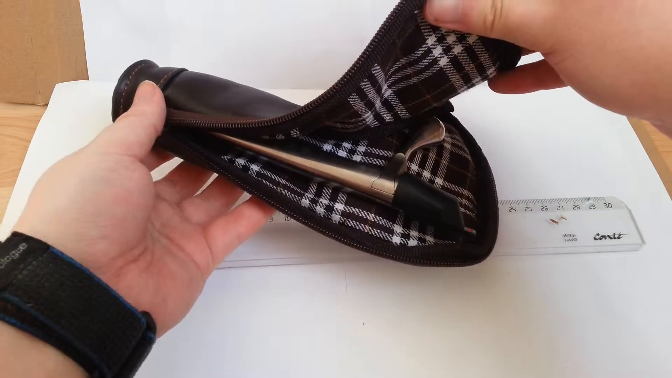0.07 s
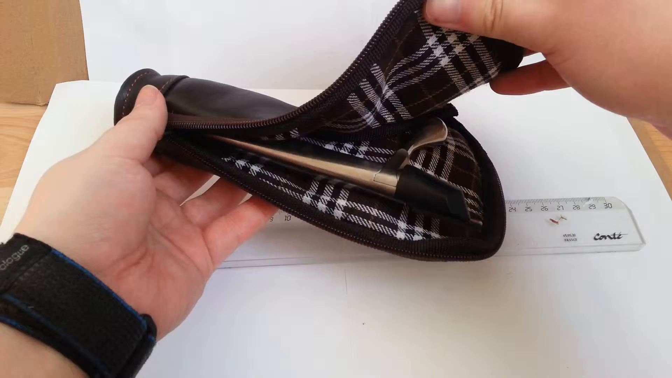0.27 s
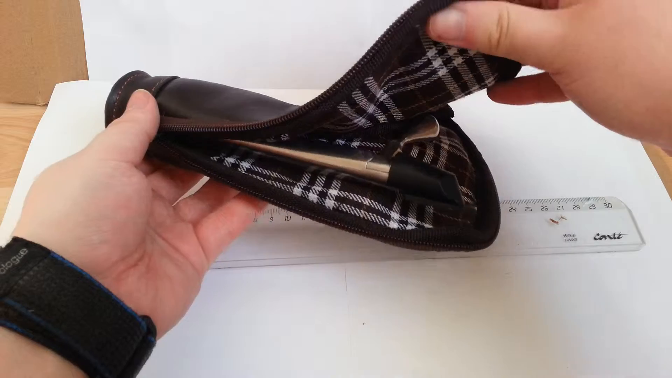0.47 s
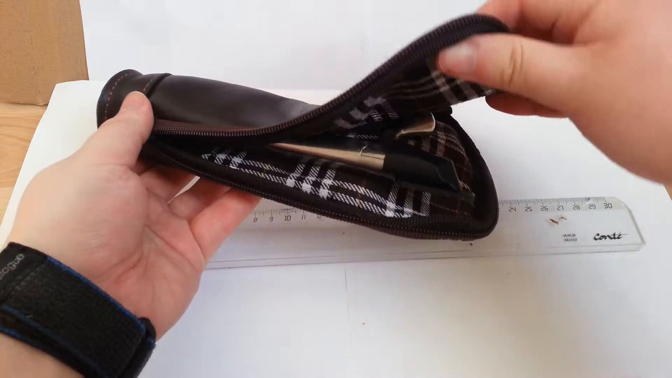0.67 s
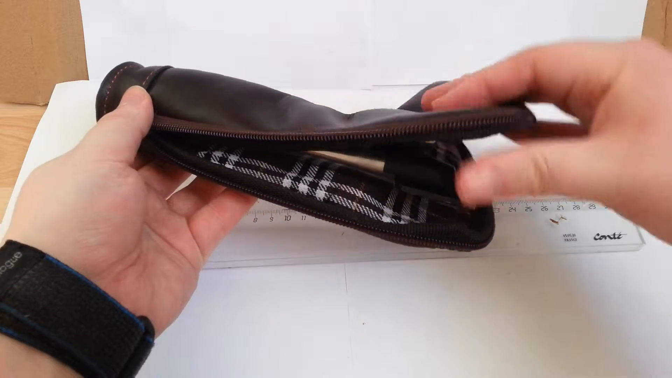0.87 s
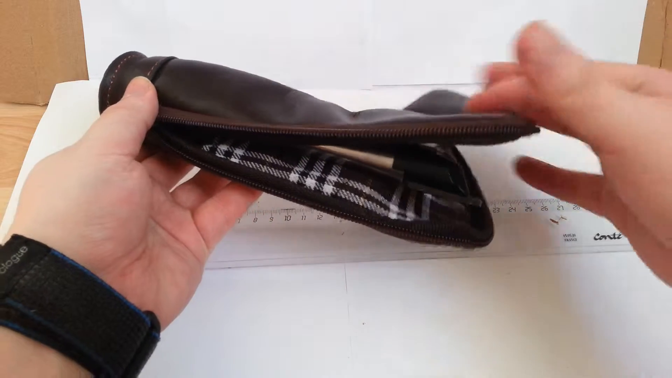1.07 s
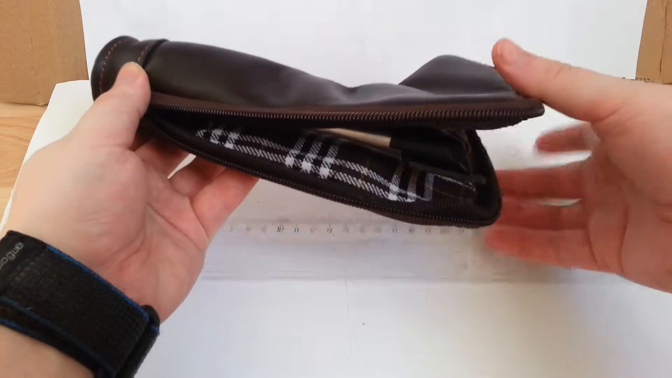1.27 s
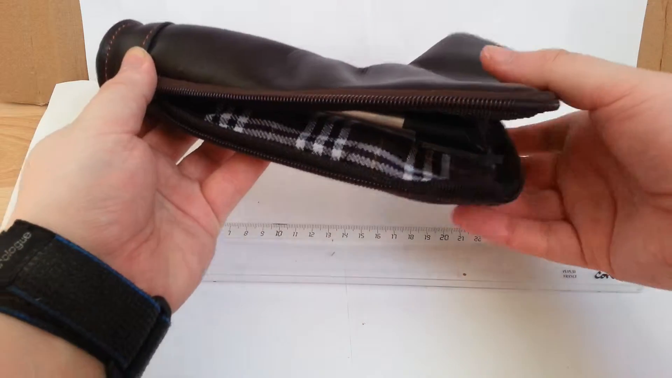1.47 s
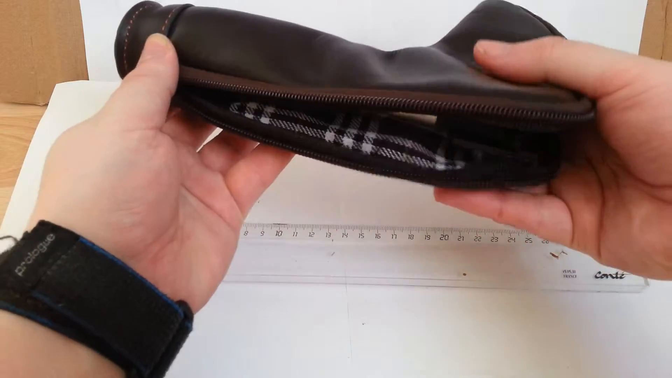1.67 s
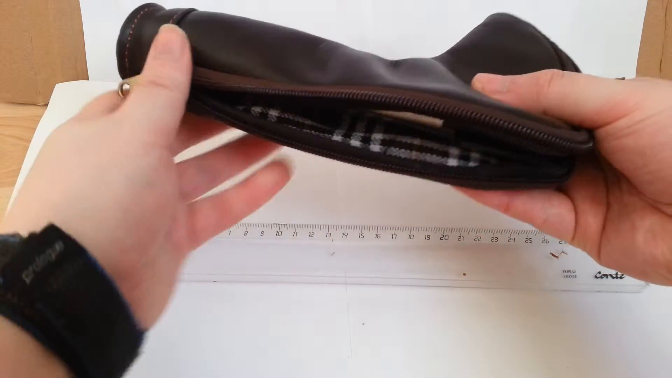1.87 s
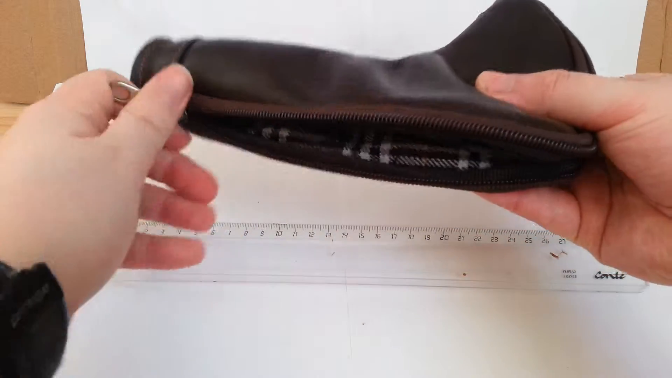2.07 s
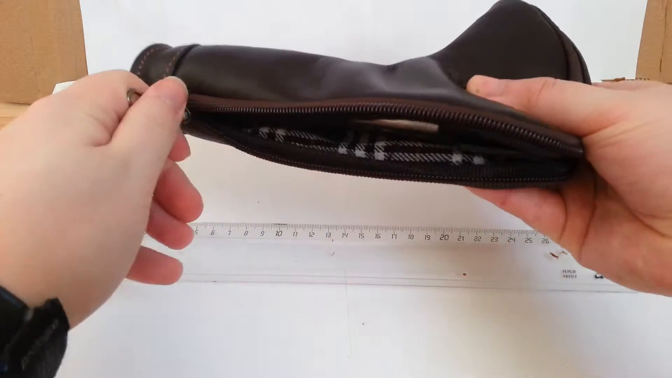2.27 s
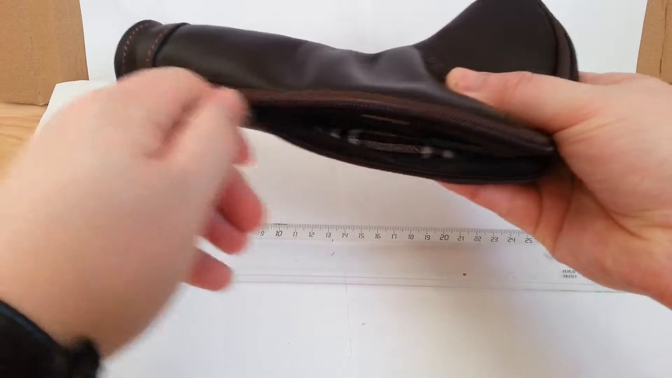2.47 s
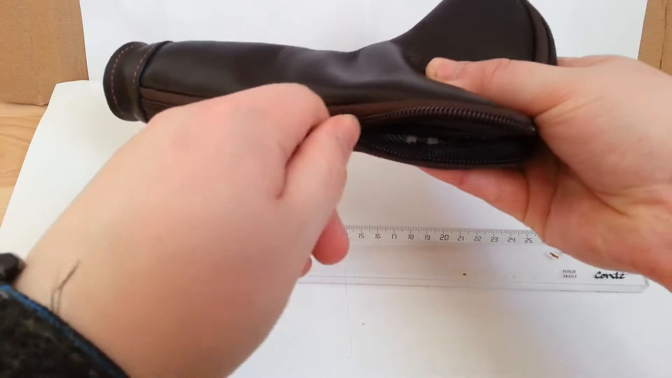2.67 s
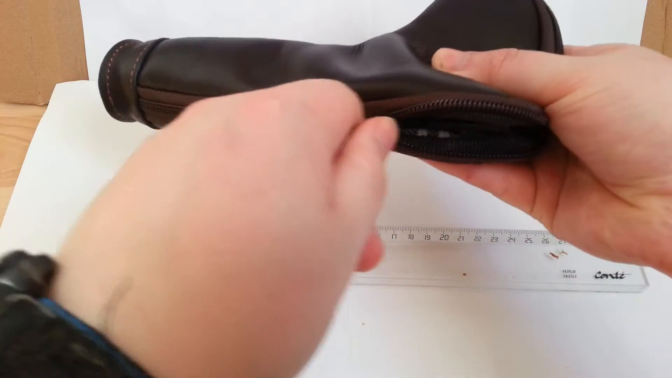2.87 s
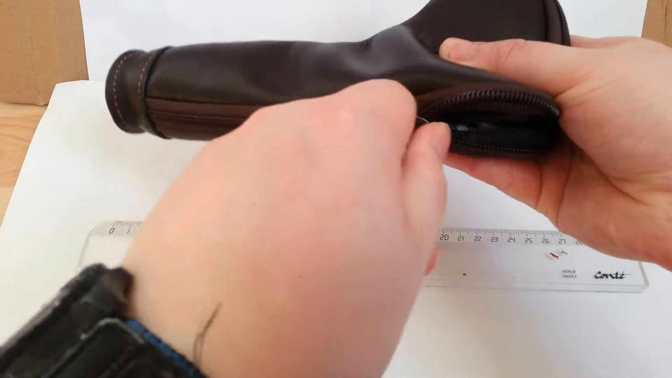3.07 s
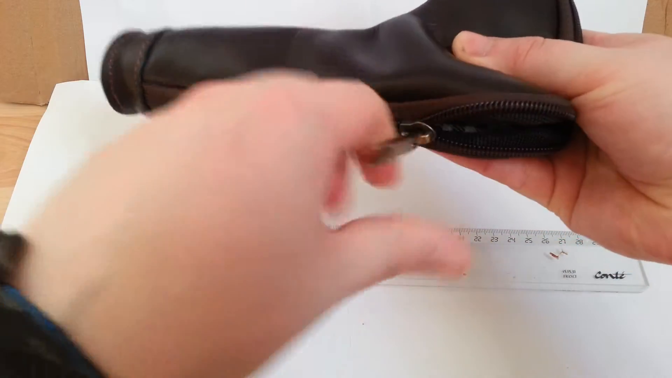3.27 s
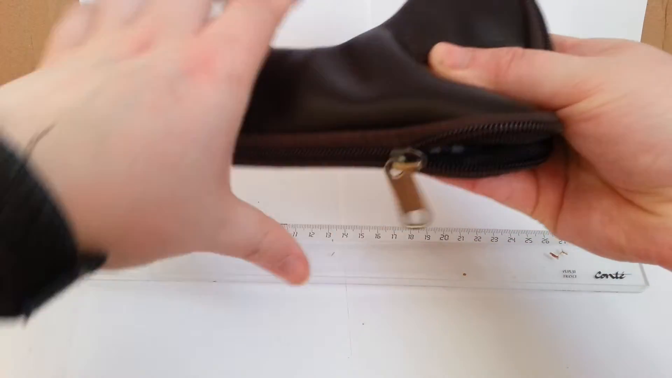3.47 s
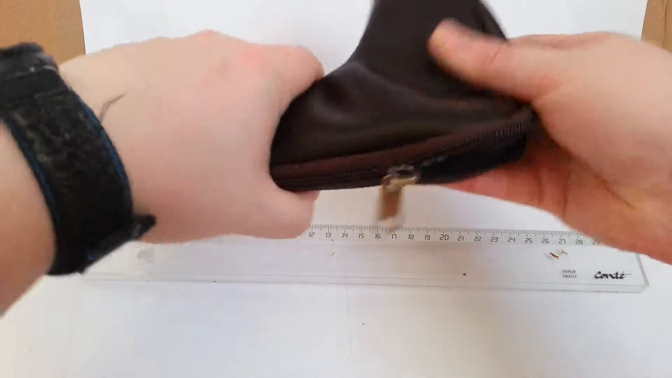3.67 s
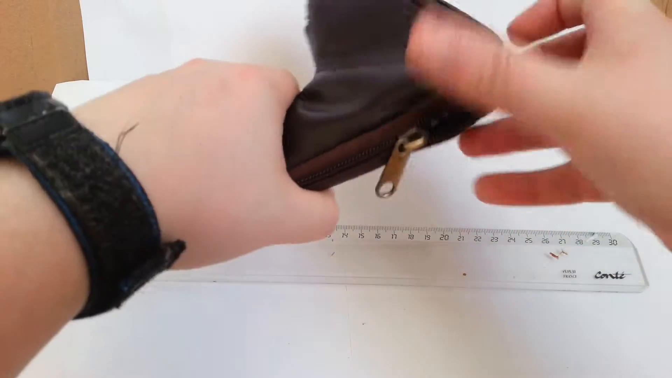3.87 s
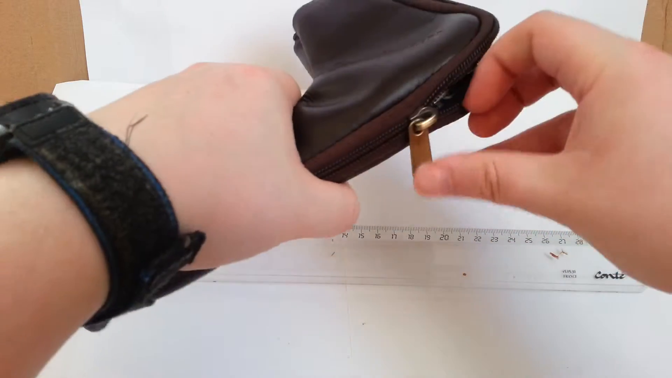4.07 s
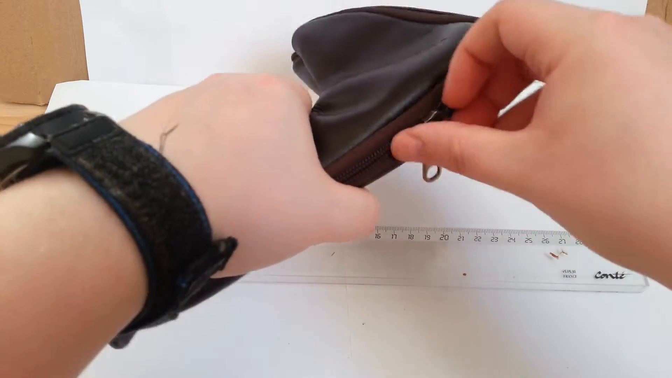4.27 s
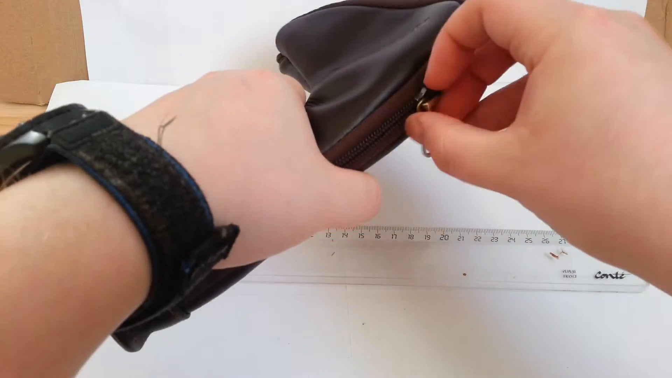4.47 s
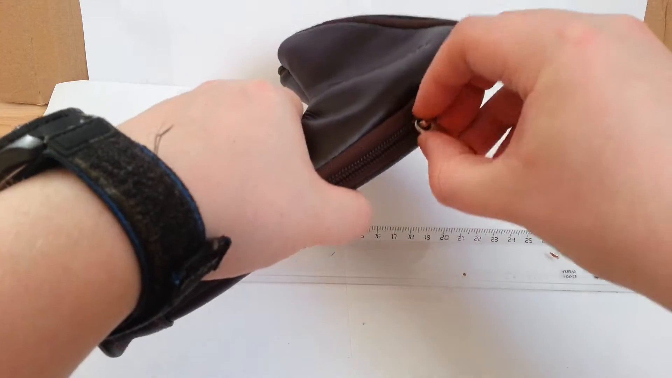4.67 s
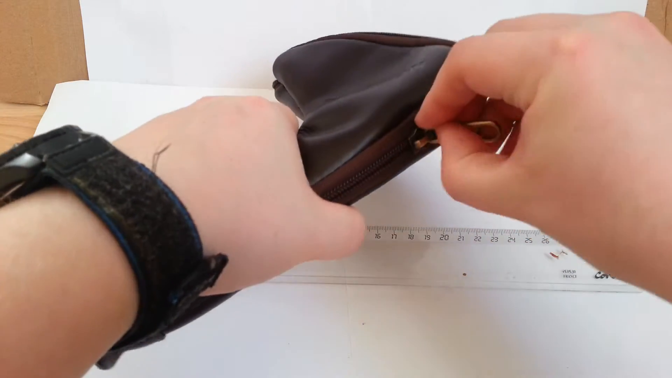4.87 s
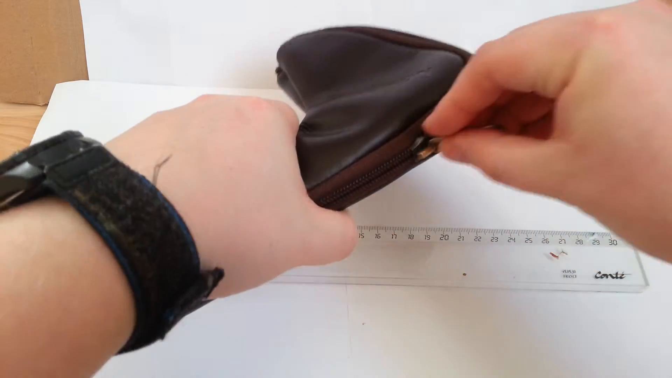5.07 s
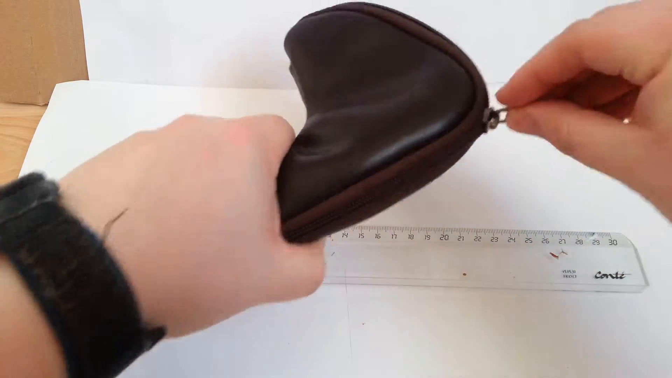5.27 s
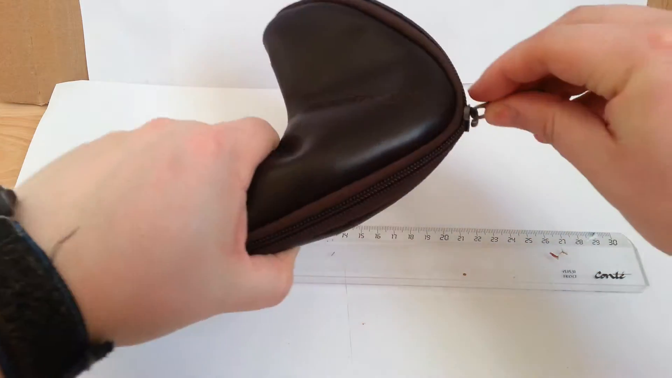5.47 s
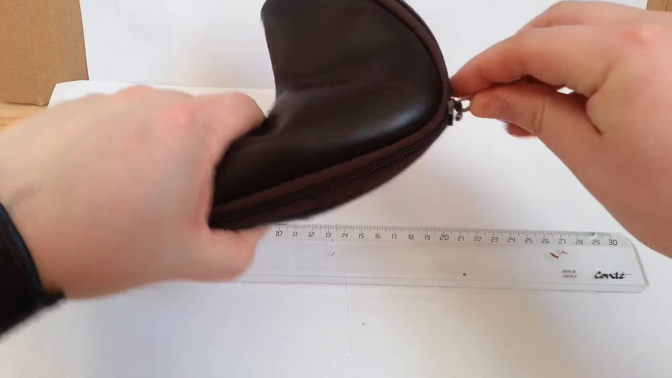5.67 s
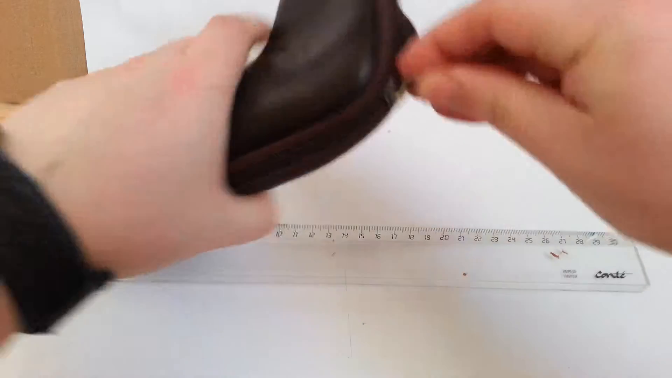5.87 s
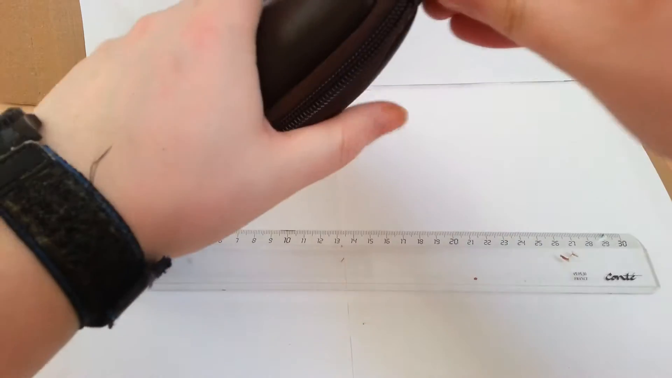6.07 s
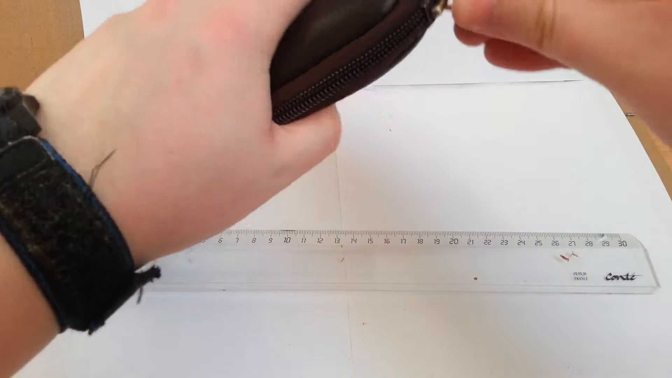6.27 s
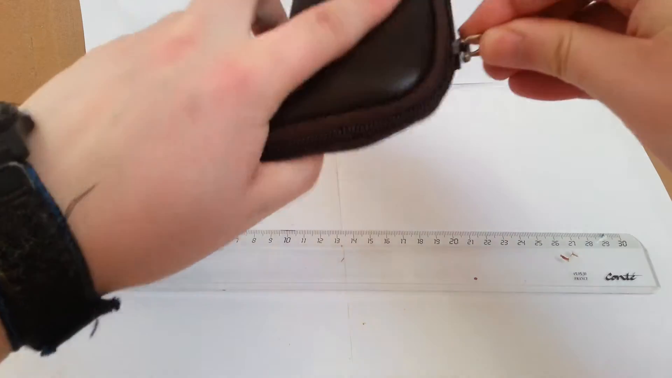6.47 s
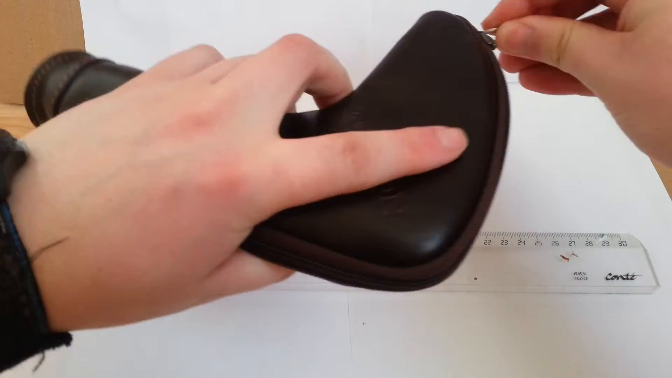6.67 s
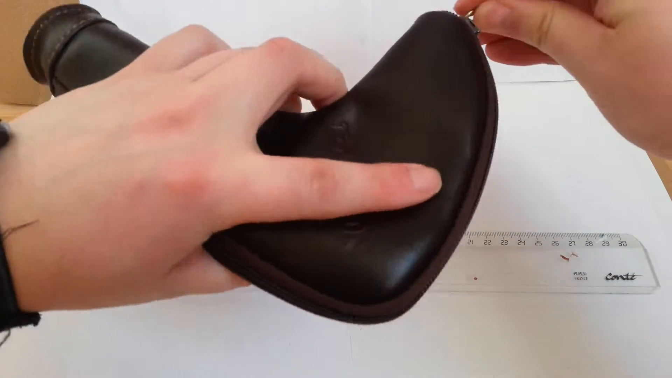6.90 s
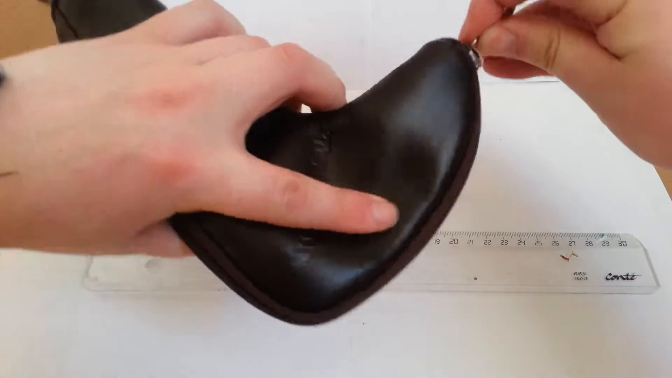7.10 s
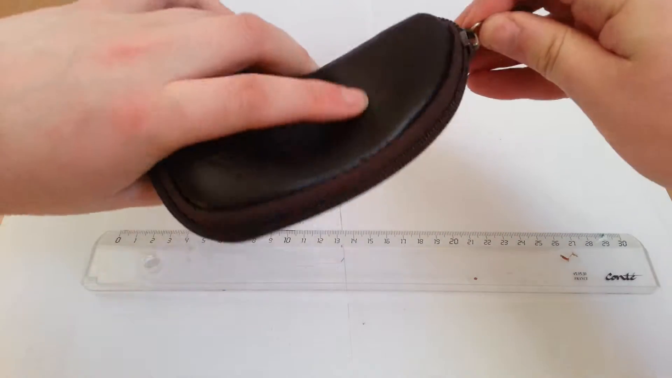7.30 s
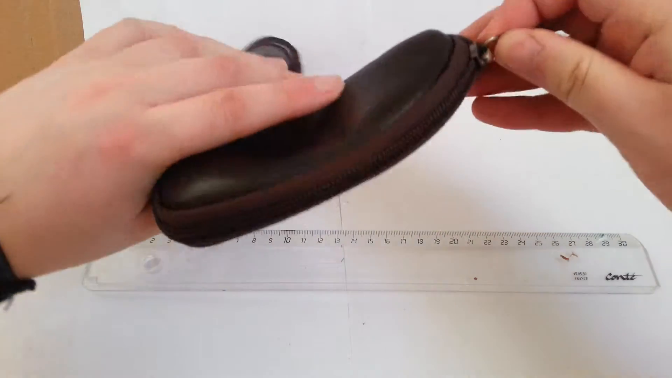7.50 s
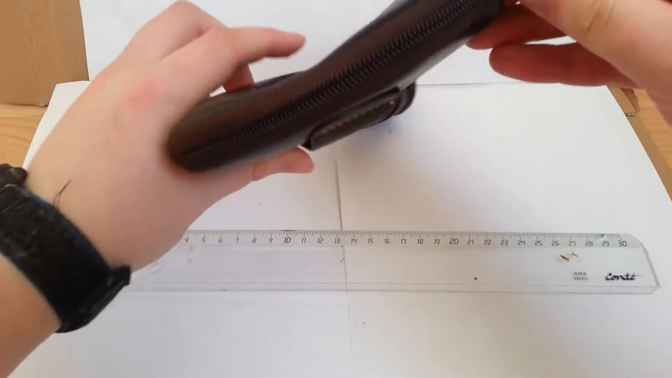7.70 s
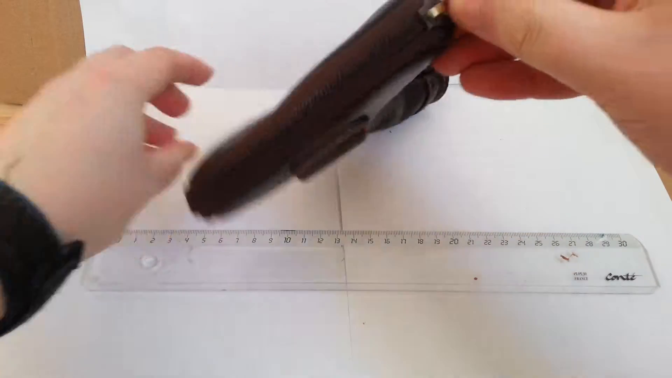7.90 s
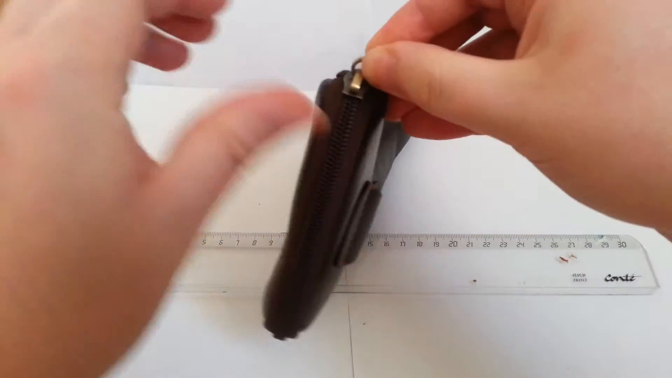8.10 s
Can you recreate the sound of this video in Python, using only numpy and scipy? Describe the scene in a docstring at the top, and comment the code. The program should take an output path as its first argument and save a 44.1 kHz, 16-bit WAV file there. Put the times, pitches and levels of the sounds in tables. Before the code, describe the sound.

Faint hiss and one small tick open the sound. At about 1.2 seconds, hands fold a leather case with a rub, a hollow thump and a brief rasp of a finger across zipper teeth. Bent leather ticks softly. From 2.4 to 3.1 seconds the zipper closes in short scraping pulls. Soft rubbing follows, with the metal pull tab clicking around 3.4, 4.6 and 4.8 seconds. Another short pull comes at 5.1. Near 6 seconds there is a thump and a sharp tab click, then the loudest, brightest zip runs from 6.4 to 6.9, ending on catching teeth. A bump at 7.6 leads into a thin skid of skin on leather and a last click at 8. Everything is close to the right microphone in a small room; the left is faint and dull. The hiss swells slightly with louder sounds.

```python
"""A zipper closed in short pulls on a leather case, close to the right microphone in a small room.
First a finger briefly rakes the teeth; in the pulls they snap and scrape through the slider and shake
the hollow case. Hands fold the case shut, rubbing, bending and bumping the leather; the metal pull tab
clicks, and skin skids once near the end. The left microphone gets a faint, dull, mostly diffuse share.
The recorder's noise suppressor lets the hiss swell with the louder sounds."""
import sys
import numpy as np
from scipy import signal
from scipy.fft import rfft, irfft
from scipy.io import wavfile
from scipy.ndimage import uniform_filter1d

SR = 44100
rng = np.random.default_rng(int(sys.argv[2]) if len(sys.argv) > 2 else 0)


def int16_out(signal):
    """Quantize to a 16-bit WAV file."""
    q = np.round(np.clip(np.atleast_2d(signal).T, -1, 1) * 32767)
    wavfile.write(sys.argv[1], SR, q.astype(np.int16))


N = 358956
TIME = np.arange(N) / SR
GRIP_FULL_S = 0.85   # the hands have taken hold and the flap starts to fold

# spectra of recorder hiss, rubbed leather and scratched rough surfaces: f/Hz, relative level/dB
HISS_SPECTRUM = [(20, -27.5), (90, -5), (180, -8), (400, -14), (3500, -26.5), (6300, -31), (9000, -28),
                 (14500, -28.5)]
LEATHER_SPECTRUM = [(100, -23.5), (260, 1.5), (1350, 3), (4000, -5), (6200, -14), (9000, -12), (15000, -19)]
SCRATCH_SPECTRUM = [(100, -42), (700, -16.5), (1400, 1), (2100, 4.5), (2850, -3), (3250, -2.5), (4400, -9),
                    (6000, -17.5), (8500, -15), (15000, -26.5)]
# response on the far side, at the left microphone: f/Hz, gain/dB
LEFT_RESPONSE = [(150, -3), (600, -22), (1200, -29.5), (3500, -42), (9000, -22)]
# resonances of the case walls, seam, slider, metal tab and case under the tab:
# f/Hz, bandwidth/Hz, relative level/dB
WALL_RESONANCES = [(280, 77, -2), (390, 37, 7.5), (432, 80, -30), (693, 26, -5)]
SEAM_RESONANCES = [(240, 64, 1), (376, 40, -2), (618, 290, -1)]
SLIDER_RESONANCES = [(522, 17, 7), (833, 183, 9.5), (967, 720, 5), (1356, 163, 6.5), (1504, 88, 2),
                     (1780, 104, -0.5)]
TAB_RESONANCES = [(3290, 943, 3.5), (5120, 640, 6.5), (6840, 1000, 0), (11995, 5500, -13)]
UNDER_TAB_RESONANCES = [(524, 230, 4.5), (1410, 500, 2.5)]
# fingers sliding on the leather: t/s, length/s, level/dB
FINGER_RUBS = [(1.06, 0.083, -54), (1.23, 0.091, -41), (1.56, 0.1, -56.5), (1.83, .27, -56),
               (2.205, 0.026, -49), (3.395, 0.02, -39.5), (3.53, .19, -47.5), (3.74, 0.26, -55),
               (4.36, 0.24, -57.5), (4.785, .04, -48.5), (5.34, 0.25, -53.5), (5.83, 0.081, -48),
               (5.92, 0.1, -41.5), (6.265, 0.21, -48.5), (6.85, .12, -72), (7.16, 0.2, -53.5),
               (7.63, .04, -47), (7.685, 0.26, -44.5), (8.05, 0.019, -41), (8.075, 0.029, -41.5)]
# bent leather ticking, thumps on the hollow case, the slider jumping one tooth: t/s, level/dB
LEATHER_TICKS = [(.04, -28), (1.605, -24), (1.855, -20.5), (1.897, -19.5), (1.985, -22.5), (2.038, -19),
                 (2.807, -21.5), (3.318, -17.5), (3.374, -22.5), (3.67, -20), (3.76, -20), (3.888, -26),
                 (4.438, -23.5), (5.829, -15.5), (6.371, -25)]
CASE_THUMPS = [(1.257, -7), (2.371, -15.5), (4.797, -22), (5.927, -5), (7.628, -11.5)]
TOOTH_CATCHES = [(2.847, -20), (2.878, -16.5), (2.908, -17), (5.841, -10), (6.775, -6.5), (6.826, -7.5)]
# a brief rasp of a finger raking the zipper teeth, then the zipper pulls, each taking over from the last:
# t/s, speed-up/s, hold/s, slow-down/s, first tooth rate/Hz, held tooth rate/Hz, force/dB, swell/dB,
# boom offset/dB, scratch offset/dB, tape note/Hz
TOOTH_STROKES = [(1.253, .02, .01, 0.11, 260, 360, -34.5, 6.5, -7, -1.5, 1450),
                 (2.367, 0.067, .03, .1, 126, 134, -33, 1.5, -9, -8.5, 1263),
                 (2.452, 0.032, 0.011, 0.14, 174, 250, -32.5, -0.5, -5.5, -4.5, 1100),
                 (2.505, 0.07, .04, 0.17, 305, 316, -34, 2, -6, -2, 1020),
                 (2.886, 0.044, .035, .1, 85.4, 98, -43, 2, -4.5, -3, 1051),
                 (3.014, 0.036, .01, .07, 87, 88, -50, 2.5, -3, -1, 1190),
                 (5.125, .06, .01, .16, 132, 297, -39.5, 8.5, -4.5, 0, 880),
                 (5.239, .03, .02, .09, 135, 115, -47, -0.5, 0.5, 0.5, 1037),
                 (6.447, 0.065, 0.038, 0.058, 170, 288, -25, 18.5, -19, -9, 1003),
                 (6.548, .055, .008, .06, 300, 440, -16.5, 3, -27.5, -12, 1530),
                 (6.664, .02, .012, .07, 128.4, 125, -34, -2.5, -6, -10.5, 910),
                 (6.782, 0.0118, .012, 0.059, 122, 125, -33, 1, -4.5, -11, 880)]
# pull tab striking the slider: t/s, level/dB, offset of the share reaching the case/dB
TAB_STRIKES = [(3.403, -28, 6), (3.416, -21, 1.5), (4.5803, -22, -1), (4.7904, -23, 4), (4.801, -15.5, 0.5),
               (5.9936, -11, -5), (6.0033, -4, -17), (8.0272, -23, 2)]


def from_db(db):
    """Decibels to gain."""
    return 10 ** (np.asarray(db) / 20)


def unit_energy(response):
    """Scale a response so that it passes white noise at unchanged power."""
    return response / np.sqrt(np.sum(response ** 2) + 1e-20)


def through(x, response):
    """Pass a signal through an impulse response."""
    return signal.oaconvolve(x, response)[:N]


def colour(points, size=4096):
    """Causal (minimum-phase) impulse response with the given spectrum."""
    hz, db = np.transpose(points)
    grid_hz = np.maximum(np.arange(size // 2 + 1) * SR / size, 1)
    gain = from_db(np.interp(np.log(grid_hz), np.log(hz), db))
    cepstrum = irfft(np.log(gain))
    cepstrum[1:size // 2] *= 2
    cepstrum[size // 2 + 1:] = 0
    return irfft(np.exp(rfft(cepstrum)))


def hiss():
    """The recorder's steady noise floor, independent in each channel."""
    response = unit_energy(colour(HISS_SPECTRUM))
    return np.array([through(white, response) for white in rng.standard_normal((2, N))])


def flutter(per_s):
    """Smooth random wander with a spread of about 1."""
    knots = rng.standard_normal(N // 20)
    return np.interp(TIME * per_s, np.arange(len(knots)), knots)


def gestures(rows, attack_s, release_s, sag_db_per_s=0):
    """Gain of hand movements: each sets in, holds or sags, and dies away."""
    gain = np.zeros(N)
    for start, length, db in rows:
        first = int(start * SR)
        t = np.arange(min(SR, N - first)) / SR
        attack = np.minimum(t / attack_s, 1)
        release = np.exp(-np.maximum(t - length, 0) / release_s)
        gain[first:first + SR] += from_db(db - sag_db_per_s * t) * attack * release
    return gain


def rubbing(grains_per_s=1500, grain_db=-5, smooth_db=-3, uneven_db=2, grip_db=-60.5):
    """Skin slides over the grain of the leather: a soft swish with tiny slips in it."""
    slips = rng.random(N) < grains_per_s / SR
    grains = slips * rng.standard_normal(N) * np.sqrt(SR / grains_per_s)
    friction = from_db(grain_db) * grains + from_db(smooth_db) * rng.standard_normal(N)
    holding = from_db(grip_db) * np.minimum(TIME / GRIP_FULL_S, 1)
    pressure = np.hypot(holding, gestures(FINGER_RUBS, attack_s=0.011, release_s=0.024))
    swish = friction * pressure * from_db(uneven_db * flutter(90))
    return through(swish, unit_energy(colour(LEATHER_SPECTRUM)))


def contacts(times, levels_db, crunch_s, crunch, size=4096):
    """Each contact is a sharp click and a short crunch of tiny slips."""
    force, t = np.zeros(N + size), np.arange(size) / SR
    for s, db, slips in zip(times, levels_db, rng.standard_normal((len(times), size))):
        burst = crunch * unit_energy(slips * np.exp(-t / crunch_s))
        burst[0] += 1   # the click
        start = int(s * SR)
        force[start:start + size] += from_db(db) * unit_energy(burst)
    return force[:N]


def ringing(modes, size=4096):
    """Impulse response of damped modes, rolled off outside their range."""
    t = np.arange(size) / SR
    rings = sum((-1) ** k * from_db(db) * width * np.exp(-np.pi * width * t) * np.cos(2 * np.pi * hz * t)
                for k, (hz, width, db) in enumerate(modes))
    band = signal.butter(2, [modes[0][0] * 0.7, modes[-1][0] * 1.2], "band", fs=SR, output="sos")
    return unit_energy(signal.sosfilt(band, rings))


def case(boom, boom_modes, rasp, scratch):
    """Three forces sound: boom in the hollow case, rasp in the slider, scratch on the rough surfaces."""
    return (through(boom, ringing(boom_modes)) + through(rasp, ringing(SLIDER_RESONANCES))
            + through(scratch, unit_energy(colour(SCRATCH_SPECTRUM))))


def knocks(rows, boom_db, scratch_db, crunch_s):
    """Brief contacts shake the walls, the slider and the rough surfaces together."""
    times, db = np.transpose(rows)
    boom = contacts(times, db + boom_db, crunch_s=0.0067, crunch=0.69)
    rasp = contacts(times, db, crunch_s, crunch=1.34)
    scratch = contacts(times, db + scratch_db, crunch_s, crunch=2.5)
    return case(boom, WALL_RESONANCES, rasp, scratch)


def handling(faint_per_s=3, faint_db=-32, spread_db=1):
    """Bent leather ticks, often very faintly; the case is thumped; the slider catches on single teeth."""
    times = GRIP_FULL_S + np.cumsum(rng.exponential(1 / faint_per_s, size=60))
    levels_db = faint_db + spread_db * rng.standard_normal(len(times))
    faint_ticks = [(s, db) for s, db in zip(times, levels_db) if s < TIME[-1]]
    return (knocks(CASE_THUMPS, boom_db=1.5, scratch_db=-4, crunch_s=0.0031)
            + knocks(TOOTH_CATCHES, boom_db=-12, scratch_db=-13.5, crunch_s=0.004)
            + knocks(list(LEATHER_TICKS) + faint_ticks, boom_db=-12, scratch_db=0, crunch_s=0.0023))


def stroke_motion(stop_teeth_per_s=80, fade_db=32, boom_db_per_octave=-1, scratch_db_per_octave=7.5,
                  note_octaves_per_db=0.17):
    """Each stroke along the teeth gets up to speed, holds and slows; its force and colour follow."""
    rate, note_hz = np.full((2, N), float(stop_teeth_per_s))
    force, boom_db, scratch_db = np.zeros((3, N))
    for start, rise, hold, fall, first_rate, held_rate, db, swell_db, boom, scratch, hz in TOOTH_STROKES:
        now = slice(int(start * SR), int((start + rise + hold + fall) * SR))
        t = TIME[now] - start
        rising = np.clip(t / rise, 0, 1)
        falling = np.clip((t - rise - hold) / fall, 0, 1)
        sped_up = np.sin(np.pi / 2 * rising) ** 2
        slowing = (stop_teeth_per_s / held_rate) ** falling
        rate[now] = first_rate * (held_rate / first_rate) ** sped_up * slowing
        # the force swells fast, levels off, then drains away as the stroke slows
        force[now] = from_db(db - swell_db * (1 - rising) ** 3.2 - fade_db * falling ** 1.05)
        boom_db[now] = boom + boom_db_per_octave * np.log2(rate[now] / held_rate)
        scratch_db[now] = scratch + scratch_db_per_octave * np.log2(first_rate / held_rate) * (1 - sped_up)
        # a swelling stroke tightens the tape and lifts its note
        slack = 1 - sped_up * (1 - falling)
        note_hz[now] = hz * 2 ** (-note_octaves_per_db * swell_db * slack)
    return rate, force, boom_db, scratch_db, note_hz


def moving_resonance(x, centre_hz, q, block=128):
    """Band-pass whose centre glides, stepped block by block."""
    out, state = np.zeros(N), np.zeros(2)
    for i in range(0, N, block):
        angle = 2 * np.pi * centre_hz[i] / SR
        radius = np.exp(-angle / q / 2)
        forward = (1 - radius ** 2) / 2 * np.array([1, 0, -1])
        feedback = [1, -2 * radius * np.cos(angle), radius ** 2]
        out[i:i + block], state = signal.lfilter(forward, feedback, x[i:i + block] + 1e-18, zi=state)
    return out


def sizzle(scratch, rate, from_teeth_per_s=338, gain_per_octave=1.6, above_hz=2500):
    """The fastest strokes scratch more brightly."""
    treble = signal.sosfilt(signal.butter(1, above_hz, "high", fs=SR, output="sos"), scratch)
    return scratch + treble * gain_per_octave * np.maximum(np.log2(rate / from_teeth_per_s), 0)


def zipper_teeth(jitter=0.105, uneven_db=1.0, slip_s=0.0024, tape_gain_db=3):
    """Each tooth snaps, then scrapes: under a raking finger at first, through the slider in the pulls."""
    rate, force, boom_db, scratch_db, note_hz = stroke_motion()
    # a stroke advances in small jerks, so the teeth come unevenly and with unequal force
    teeth = np.cumsum(rate * (1 + jitter * flutter(300))) / SR
    tooth_gain = from_db(uneven_db * rng.standard_normal(N // 20))[teeth.astype(int)]
    snaps = np.diff(np.floor(teeth), prepend=0) * np.sqrt(SR / rate)
    # friction is strongest just after each snap; at speed the scrapes run together
    grip = np.exp(-(teeth % 1) / rate / slip_s)
    grip_power = slip_s * rate / 2 * (1 - np.exp(-2 / (slip_s * rate)))
    scrape = grip / np.sqrt(grip_power) * rng.standard_normal(N)
    boom, rasp, scratch = (force * tooth_gain * (snaps + grit * scrape) / np.hypot(1, grit)
                           for grit in (0.78, 0.6, 4))
    # the stretched tape favours the rasp near its own note
    rasp = moving_resonance(rasp, note_hz, q=2.4) * from_db(tape_gain_db)
    scratch = sizzle(scratch, rate) * from_db(scratch_db)
    return case(boom * from_db(boom_db), SEAM_RESONANCES, rasp, scratch)


def pull_tab():
    """The metal tab clicks, damped at once by the fingers; part of each click passes into the case."""
    times, db, case_db = np.transpose(TAB_STRIKES)
    on_tab = contacts(times, db, crunch_s=0.003, crunch=4.6)
    on_case = contacts(times, db + case_db, crunch_s=0.003, crunch=2.7)
    return through(on_tab, ringing(TAB_RESONANCES)) + through(on_case, ringing(UNDER_TAB_RESONANCES))


def skin_skid(start_s=7.69, length_s=0.26, db=-52, squeaks_hz=(3400, 4330, 5300), q=20, octaves_per_s=0.4):
    """Dry skin skids on polished leather: a thin, high swish that falls slightly as the skin slows."""
    pressure = gestures([(start_s, length_s, db)], attack_s=0.0099, release_s=0.012, sag_db_per_s=20)
    friction = pressure * rng.standard_normal(N)
    glide = 2 ** (-octaves_per_s * np.clip(TIME - start_s, 0, length_s))
    return sum((-1) ** k * moving_resonance(friction, hz * glide, q) * np.sqrt(q * SR / (2 * np.pi * hz))
               for k, hz in enumerate(squeaks_hz))


def reflections(x, t60_s, dull_hz):
    """Dense echoes that begin with the table top, 2 ms after the direct sound, and die away."""
    t = np.arange(SR) / SR
    echoes = rng.standard_normal(SR) * from_db(-60 * t / t60_s) * (t > 0.002)
    return through(x, signal.lfilter(*signal.butter(1, dull_hz, fs=SR), unit_energy(echoes)))


def scene(early_db=-9, room_db=-6.5, hiss_db=-51.5):
    """The right microphone is close to the hands; the left, on the far side, hears mostly room."""
    direct = zipper_teeth() + handling() + pull_tab() + rubbing() + skin_skid()
    right = direct + from_db(early_db) * reflections(direct, t60_s=0.09, dull_hz=8000)
    right += from_db(room_db) * reflections(direct, t60_s=0.29, dull_hz=5040)
    diffuse = reflections(direct, t60_s=0.53, dull_hz=6000)
    left = through(0.31 * direct + 0.96 * diffuse, colour(LEFT_RESPONSE))
    return np.array([left, right]) + from_db(hiss_db) * hiss()


def suppressor(x, shut_db=-56, range_db=20, depth_db=6, release_db_per_s=18, split_hz=150):
    """Turns all down; sound at the right microphone opens it above the bass, and it closes slowly."""
    heard = signal.sosfilt(signal.butter(2, [400, 6000], "band", fs=SR, output="sos"), x[1])
    level_db = 10 * np.log10(np.maximum(uniform_filter1d(heard ** 2, size=600), 1e-12))
    opening_db = depth_db * np.clip((level_db - shut_db) / range_db, 0, 1)
    release_db = release_db_per_s * TIME
    held_db = np.maximum.accumulate(opening_db + release_db) - release_db
    bass, rest = (signal.sosfilt(signal.butter(3, split_hz, side, fs=SR, output="sos"), x)
                  for side in ("low", "high"))
    return from_db(-depth_db) * (bass + rest * from_db(held_db))


def record(dry):
    """The recorder suppresses noise, then cuts steeply above 14.6 kHz."""
    top_cut = signal.ellip(10, 0.1, 80, 14600, fs=SR, output="sos")
    return signal.sosfilt(top_cut, suppressor(dry))


dry = scene()
out = record(dry)
int16_out(out)
```